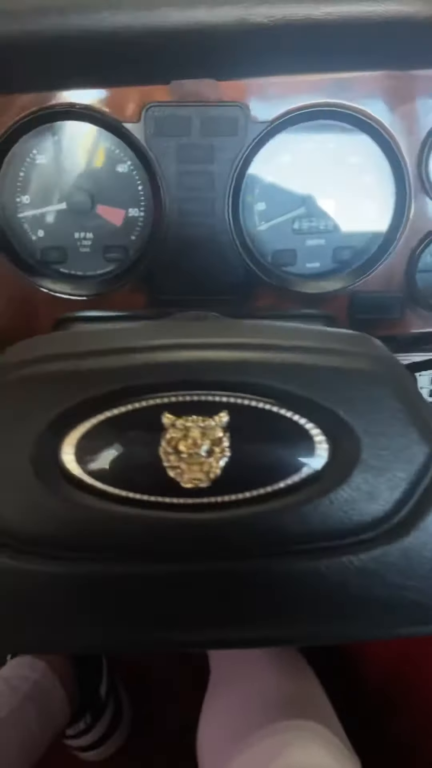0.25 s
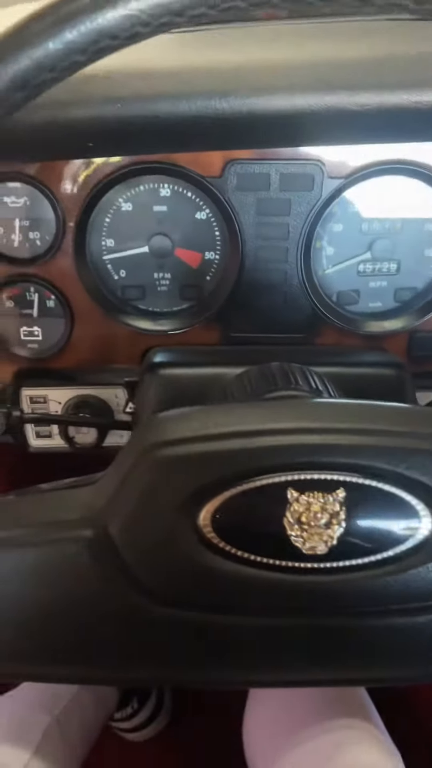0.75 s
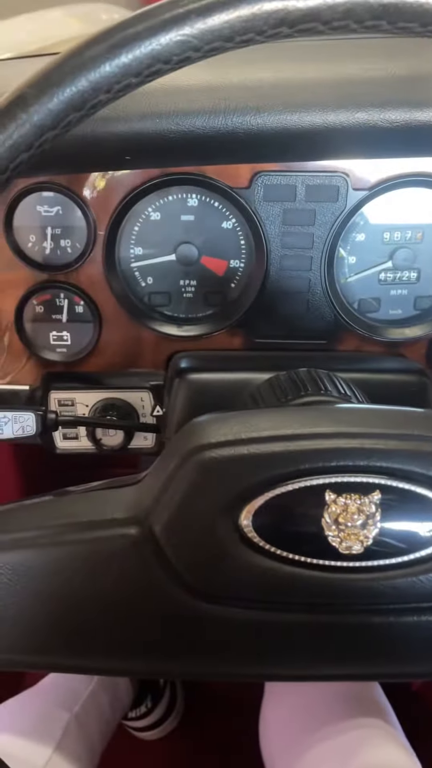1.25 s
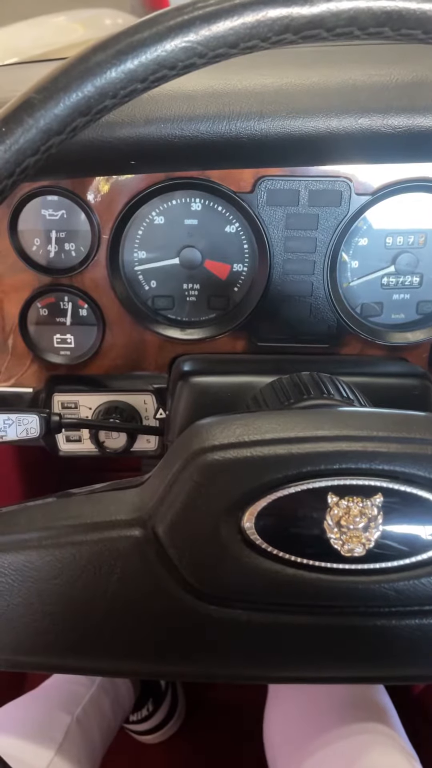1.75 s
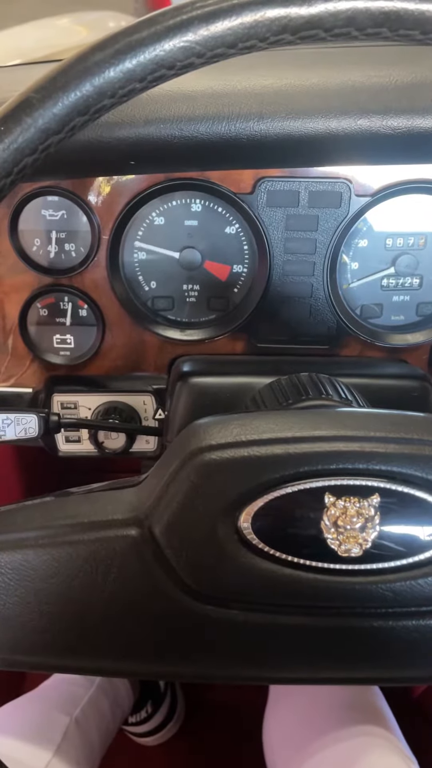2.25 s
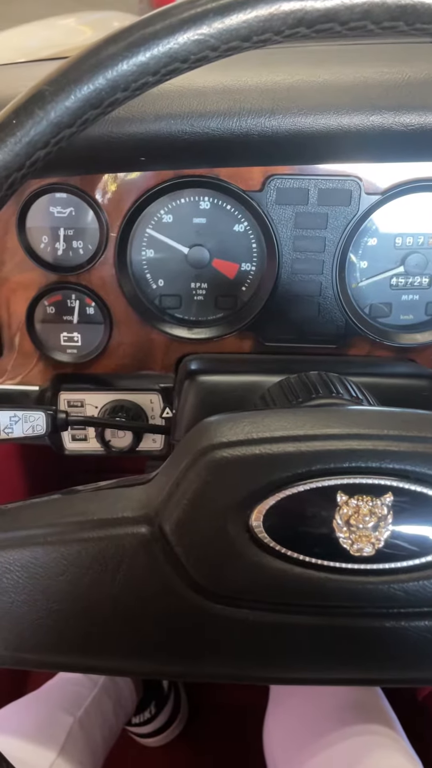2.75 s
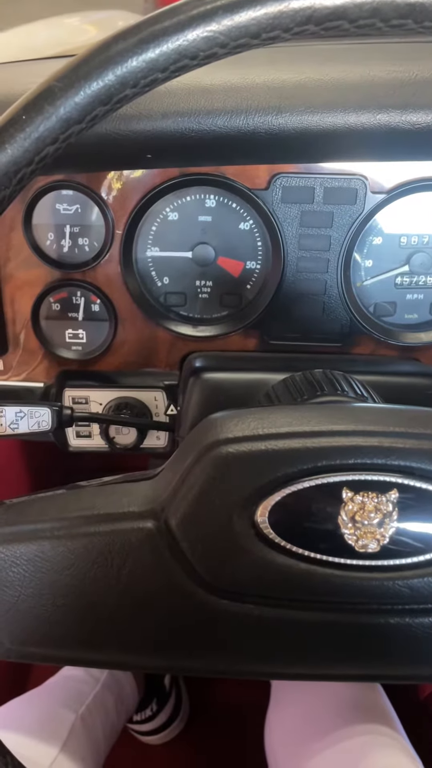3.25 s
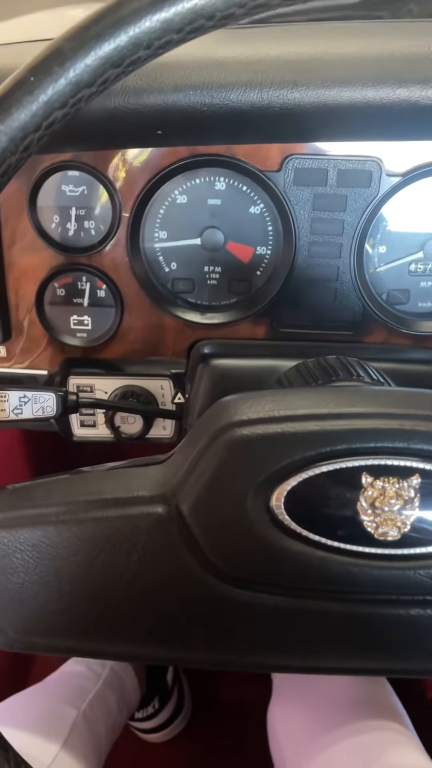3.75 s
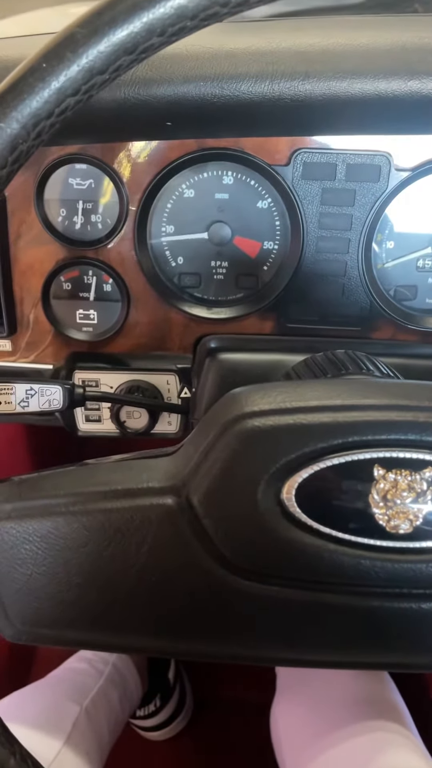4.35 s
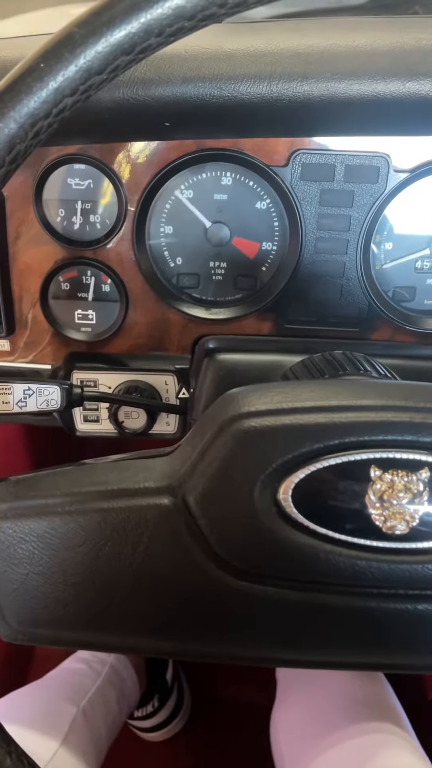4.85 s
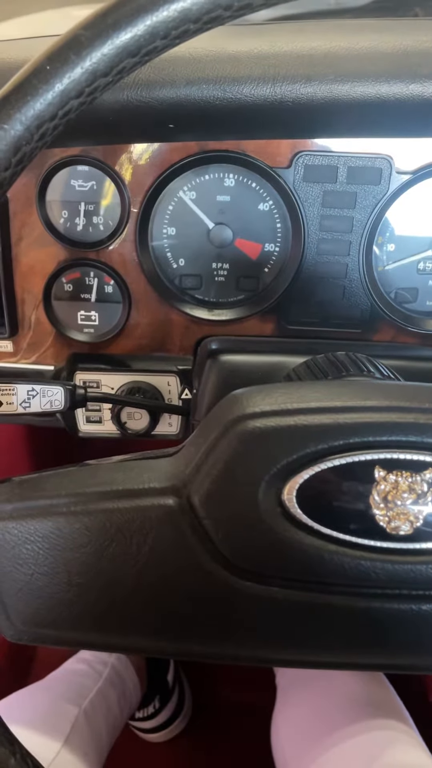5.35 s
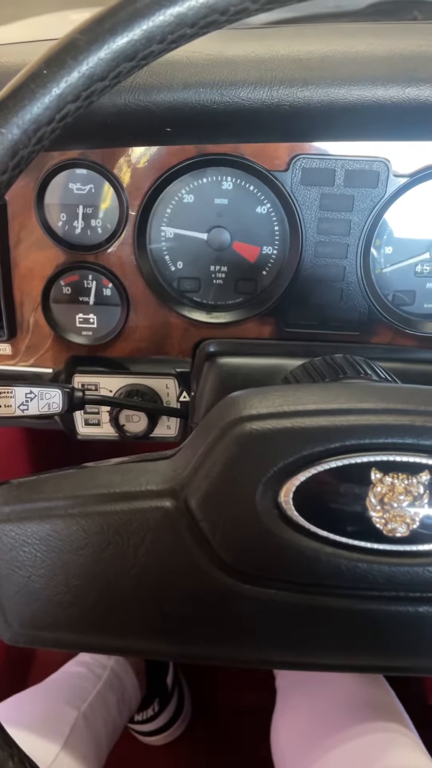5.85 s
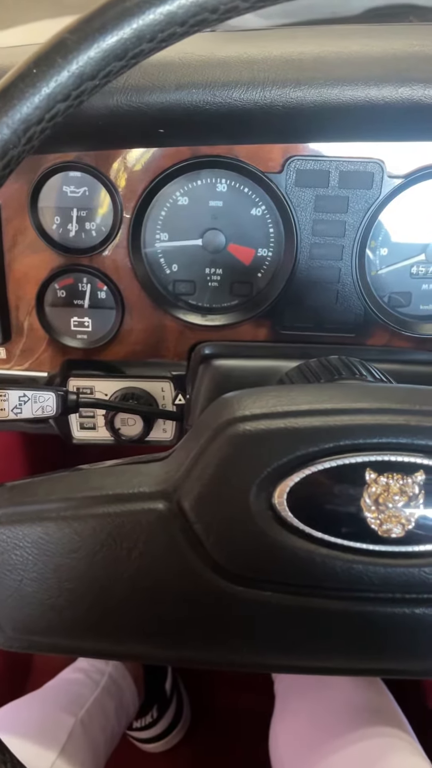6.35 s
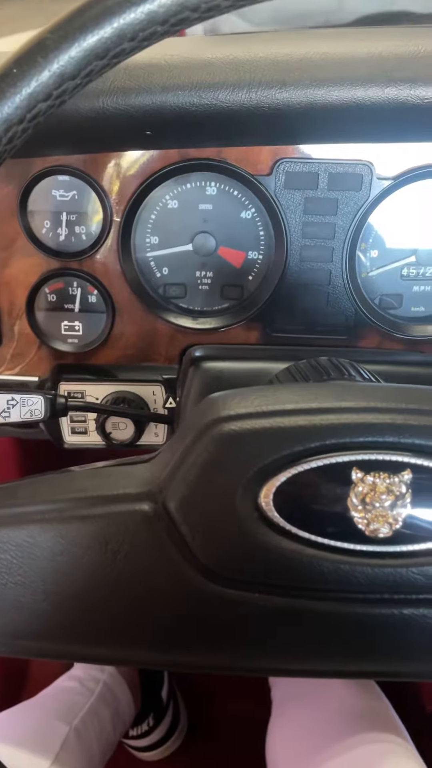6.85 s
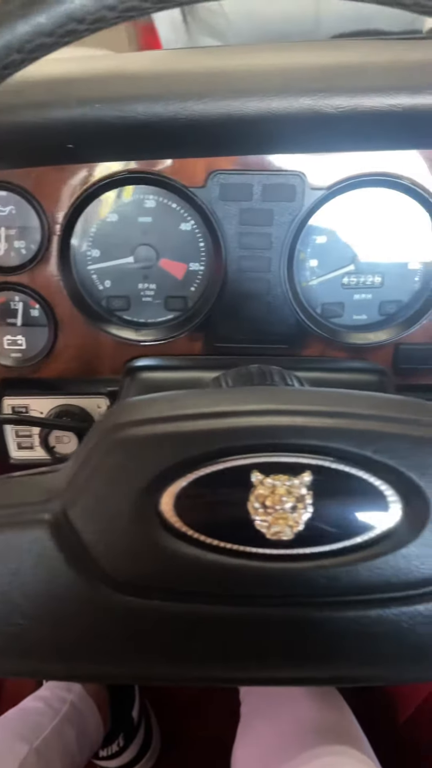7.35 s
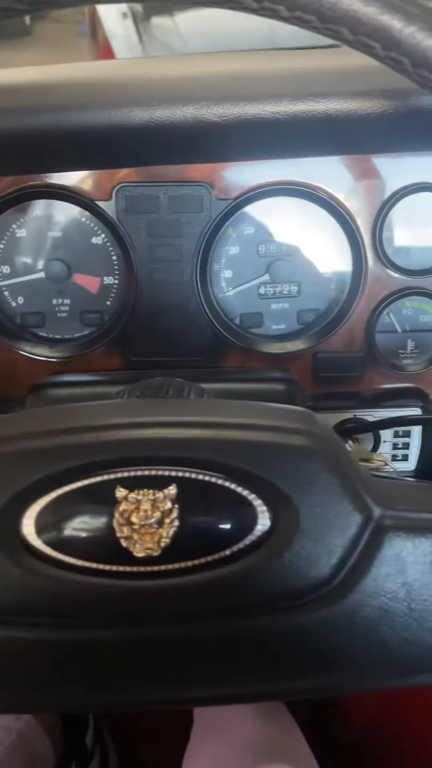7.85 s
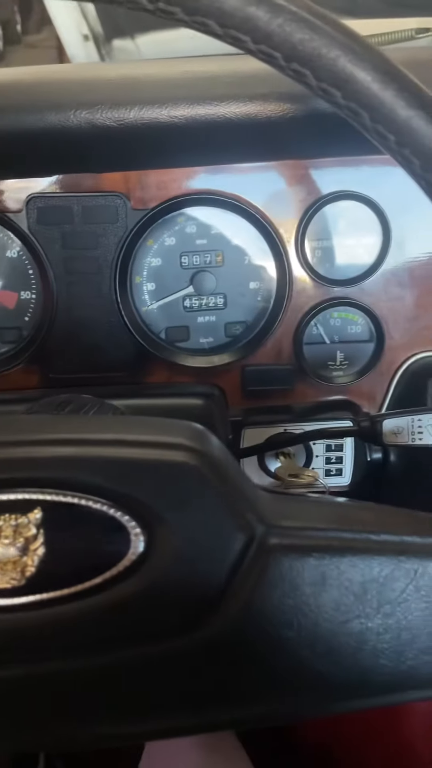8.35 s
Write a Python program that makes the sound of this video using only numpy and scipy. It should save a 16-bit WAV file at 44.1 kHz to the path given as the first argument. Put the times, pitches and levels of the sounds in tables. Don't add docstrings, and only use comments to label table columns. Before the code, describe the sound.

Inside a parked car, a handheld stereo phone at the driver's seat picks up a six-cylinder engine. From 0 to 1.7 seconds it idles evenly, a deep soft throb of about 37 pulses per second under gentle valve and mechanical rush, with faint electrical whine and trim buzz. At about 1.8 the throttle hisses open and the engine swells to a boomy, growling peak around 2.4, then falls with low exhaust thumps, nearing idle by 3.6. Leather creaks faintly around 3.9 and 4.4. From 4.2 a second, stronger blip climbs, with airy hiss and intake honk, to a higher peak near 5, held until about 5.3. Panels ring and boom loudly as it runs down through 5.8. By 6.5 it dips slightly below idle, then steadies, purring unchanged until the end at 8.6. The cabin is close and muffled, with very short reflections.

```python
import sys
import numpy as np
from scipy import signal
from scipy.fft import rfft, irfft, next_fast_len
from scipy.io import wavfile
from scipy.ndimage import uniform_filter1d

SR = 44100
rng = np.random.default_rng(int(sys.argv[2]) if len(sys.argv) > 2 else 0)


def ratio(d):
    e = np.asarray(d, float) / 20
    return 10 ** e


def output_pcm(signal):
    pcm = np.clip(np.atleast_2d(signal).T, -1, 1) * 32767
    wavfile.write(sys.argv[1], SR, np.round(pcm).astype(np.int16))


N = 379701
IDLE_HZ = 37

# frequency in Hz, lead in radians.
PORT_LEAD = [(0, 0), (190, -.1), (255, .2), (300, -1.2), (335, -.9), (370, .4), (410, 0), (455, .7),
             (550, .1), (620, 1.3), (710, 3), (770, .9), (820, 1.3), (900, .6), (1100, .7), (1170, -.7),
             (1240, 2.4), (1320, 2.2), (1380, 0), (1700, -.1), (2400, -1.2), (3100, .1), (5200, .7),
             (5900, -.1), (6550, -.75), (7240, -2.1), (8250, -3.14), (9300, -4.1), (10000, -5),
             (11600, -6.28), (12800, -7), (13600, -8.6), (14600, -9.42), (16000, -9.8)]
# frequency in Hz, left minus right in dB.
PORT_LEAN = [(60, -3), (110, 4.5), (200, 1.5), (240, 7.5), (300, -3), (370, -2), (470, 4.5), (560, -3),
             (770, 4), (900, 1.5), (1220, -0.5), (2230, 0.5), (4070, 6.5), (7440, 1.5), (13600, -1.5)]


def in_time(rows):
    s, *columns = np.transpose(rows)
    return [np.interp(np.arange(N) / SR, s, c) for c in columns]


def at_hz(points, hz):
    point_hz, value = np.transpose(points)
    return np.interp(np.log(hz + 1), np.log(point_hz + 1), value)


def drift(rate):
    step = 40
    pole = np.exp(-2 * np.pi * rate * step / SR)
    draws = rng.standard_normal(N // step + 2002)
    slow = signal.lfilter([1], [1, -2 * pole, pole * pole], draws)[2000:]
    return np.interp(np.arange(N) / step, np.arange(len(slow)), slow / slow.std())


def per_firing(firings):
    count = int(firings[-1]) + 2
    return np.interp(firings, np.arange(count), rng.standard_normal(count))


def tone(hz):
    return np.sqrt(2) * np.sin(2 * np.pi * np.cumsum(hz) / SR)


def follows_speed(rate, pull, idle_db, doubling_db, lag_s, pulling_db, rounding_db):
    s = np.arange(N) / SR
    doublings = np.log2(np.interp(s - lag_s, s, rate) / IDLE_HZ)
    swell_db = doubling_db * doublings - rounding_db * doublings ** 2
    return idle_db + swell_db + pulling_db * np.maximum(pull, 0)


def cabin_echo(t60_s):
    s = np.arange(SR // 8) / SR
    echo = rng.standard_normal((2, len(s))) * ratio(-60 * s / t60_s)
    return echo / np.sqrt(np.sum(echo ** 2, axis=1, keepdims=True))


def heard_noise(spectrum, modes=(), pulses=0):
    # frequency in Hz, likeness from 0 to 1.
    likeness = [(60, .995), (130, 0.96), (190, 1), (236, .85), (275, .4), (312, .9), (355, .5), (420, .7),
                (475, .1), (540, .45), (600, .15), (700, .5), (740, .25), (780, .65), (840, .35),
                (930, .72), (1030, .68), (1180, .2), (1290, .5), (1380, .25), (1440, .6), (1520, .3),
                (1690, .6), (1930, .15), (2250, .5), (2600, 0.2), (3800, 0.64), (5200, 0.56), (6500, 0.84),
                (8000, 1), (15000, 0.83)]
    size = next_fast_len(N)
    hz = np.arange(size // 2 + 1) * SR / size
    gain_db = at_hz(spectrum, hz)
    for centre_hz, width_hz, db in modes:
        gain_db = gain_db + db / (1 + (2 * (hz - centre_hz) / width_hz) ** 2)
    near = rfft(cabin_echo(0.068)[0], size)
    gain = ratio(gain_db) * np.abs(1 + 0.43 * np.clip(hz / 1200 - 1, 0, 1) * near)
    shared, own = rfft(rng.standard_normal((2, N)) + pulses, size)
    alike = np.clip(at_hz(likeness, hz), 0, 1)
    lead = np.interp(hz, *np.transpose(PORT_LEAD))
    ports = ratio(at_hz(PORT_LEAN, hz) / 2) * np.exp(.5j * lead)
    left = np.sqrt(1 + alike) * shared + np.sqrt(1 - alike) * own
    right = np.sqrt(1 + alike) * shared - np.sqrt(1 - alike) * own
    pair = irfft(gain * np.array([left * ports, right / ports]), size)[:, :N]
    return pair / pair.std()


def swelling_booms(table):
    out = np.zeros((2, N))
    side = np.array([[.5], [-.5]])
    for start_s, hz, db, rise_s in table:
        s = np.arange(int(6 * rise_s * SR)) / SR
        swell = (s / rise_s * np.exp(1 - s / rise_s)) ** 2
        level = ratio(db + side * at_hz(PORT_LEAN, hz))
        lead = side * np.interp(hz, *np.transpose(PORT_LEAD))
        at = int(start_s * SR)
        out[:, at:at + len(s)] += level * swell * np.sin(2 * np.pi * hz * s + lead)
    return out


def crank_speed():
    # time in seconds, firing rate in Hz.
    speed = [(0, 36.67), (.4, 36.44), (.7, 37.02), (1.6, 37), (1.86, 44.24), (2.29, 74.18), (2.39, 80.7),
             (2.52, 79.97), (3.12, 50.64), (3.6, 38.17), (4.02, 35.02), (4.36, 47.52), (4.7, 81.3),
             (4.95, 94.94), (5.245, 94.83), (5.44, 83.28), (5.94, 51.6), (6.25, 40.85), (6.52, 36.67),
             (6.8, 35.45), (7.03, 34.93), (7.18, 36.64), (7.55, 37.78), (7.9, 36.92), (8.61, 36.55)]
    return uniform_filter1d(in_time(speed)[0], SR // 12)


def engine_pull(rate):
    drag_per_s, full_pull_hz_per_s = 0.16, 32
    effort = np.gradient(rate) * SR + drag_per_s * (rate - IDLE_HZ)
    return np.tanh(effort / full_pull_hz_per_s)


def air_draw():
    # time in seconds, level in dB.
    air = [(0.0, -56.5), (1.63, -55.5), (1.68, -53), (1.75, -56), (1.82, -50), (2.4, -48), (2.49, -57),
           (3.43, -64), (4.15, -56.5), (4.175, -49.5), (4.27, -50), (4.53, -45.5), (6.28, -65), (6.88, -58),
           (7.87, -57.5), (8.61, -60)]
    return in_time(air)[0]


def order_levels(rate, pull):
    # the order's own pitch in Hz, level in dB.
    first_path = [(34, -28), (38, -29), (46.5, -15.5), (52, -19.5), (58, -37), (69, -23.5), (79, -30.5),
                  (87, -24.5), (95, -22.5)]
    second_path = [(70, -29.5), (76, -35), (90, -31.5), (100, -41), (120, -35), (135, -60), (175, -66),
                   (195, -51)]
    uneven_path = [(55, -45), (67, -31), (85, -46), (96, -39), (105, -32.5), (120, -30.5), (133, -42),
                   (140, -53)]
    half_path = [(18, -38), (24, -35), (29, -52), (34, -44), (39, -36), (43, -38.5), (48, -56)]
    cabin_lag_s, fuel_cut_hz, flutter_db = 0.022, 66, .4
    s = np.arange(N) / SR
    rate = np.interp(s - cabin_lag_s, s, rate)
    revving = np.clip(rate / IDLE_HZ - 1.3, 0, .5) * 2
    deeper = 1 + .9 * np.clip(rate / fuel_cut_hz - 1, 0, .2) * 5
    # path, orders per firing, dB when pulling, dB on the overrun
    orders = [(first_path, 1, 1.5, -12), (second_path, 2, 3, -4.5),
              (uneven_path, 1.5, 1.5, -4.5), (half_path, .5, -23, 0)]
    levels = []
    for path, order, pulling_db, overrun_db in orders:
        load_db = pulling_db * np.maximum(pull, 0) - overrun_db * np.minimum(pull, 0) * deeper
        levels.append(at_hz(path, order * rate) + load_db + flutter_db * revving * drift(7.07))
    return levels


def exhaust_boom(rate, pull, firings):
    # frequency in Hz, level in dB.
    third_path = [(95, -43), (110, -42), (128, -42), (150, -47), (210, -45), (300, -48)]
    first_db, second_db, uneven_db, half_db = order_levels(rate, pull)
    third_db = at_hz(third_path, 3 * rate)
    turn = 2 * np.pi * firings
    slant = -.95
    first = ratio(first_db + 0.78 * drift(3.7)) * np.cos(turn + .08 * drift(4.7))
    second = ratio(second_db + 0.7 * per_firing(firings)) * np.cos(2 * turn + slant + 0.2 * drift(3.0))
    third = ratio(third_db + 0.64 * per_firing(firings))
    third = third * np.cos(3 * turn + 1.45 * slant + 0.32 * drift(1.5))
    lower = ratio(third_db - 2.0 + 2.0 * drift(4.2)) * np.cos(2.5 * turn + .5 * drift(3.3))
    upper = ratio(third_db - 9.5 + 2.0 * drift(8.8)) * np.cos(3.5 * turn + .5 * drift(2.2))
    revving = np.clip((rate - 50) / 15, .12, 1)
    uneven = ratio(uneven_db) * np.cos(1.5 * turn + .5 * drift(2))
    half = ratio(half_db) * np.cos(turn / 2 + 0.37 * drift(0.59)) * revving
    boom = -np.sqrt(2) * (first + second + third + lower + upper + revving * (uneven + half))
    return boom * ratio([[.4], [-.4]])


def combustion(rate, firings):
    cylinders = [2.5, 2.5, 4, -14, 3.5, -3]
    at = np.flatnonzero(np.diff(np.floor(firings)))
    strength_db = np.resize(cylinders, len(at)) + 0.65 * rng.standard_normal(len(at))
    knocks = np.zeros(N)
    knocks[at] = ratio(strength_db) / np.sqrt(rate[at])
    size = next_fast_len(N)
    echo = rfft(cabin_echo(0.16), size)
    smeared = irfft(rfft(knocks, size) * echo / np.abs(echo), size)[:, :N]
    return .5 * smeared / smeared.std()


def body_rumble(roar_db):
    # frequency in Hz, level in dB per Hz.
    rumble = [(20, -29), (30, -6), (38, -3), (45, 1.5), (60, 2), (90, 5.5), (125, -3.5), (150, -1.5),
              (200, -47.5)]
    return ratio(-13.5 + 0.64 * roar_db) * heard_noise(rumble)


def panel_roar(rate, roar_db, filled_db, knocks):
    # frequency in Hz, level in dB per Hz.
    roar = [(110, -72), (150, -20), (200, -7.5), (270, -10), (400, -13), (550, -19.5), (680, -19),
            (900, -66)]
    # frequency in Hz, width in Hz, height in dB.
    panels = [(176.2, 18.8, 10), (194.1, 11.2, 7), (213.3, 13, 4), (257, 17, -3), (303, 10.6, 5),
              (319.8, 19.8, 9.5), (344.5, 11.4, 6.5), (418, 15, 6.5), (435.8, 12, 7), (472, 25, -2),
              (514, 10, 2.5), (565, 40, -3), (605, 40, 4)]
    surge_db = .7 * np.log2(rate / IDLE_HZ) * drift(3.9)
    level_db = roar_db + surge_db + 0.1 * filled_db + 0.5 + 0.079 * drift(11.0)
    return ratio(level_db) * heard_noise(roar, panels, pulses=knocks)


def bulkhead_rush(rush_db, filled_db, beat, knocks):
    # frequency in Hz, level in dB per Hz.
    rush = [(350, -10.5), (520, 3), (700, -3), (950, -6.5), (1300, -2.5), (1900, -6.5), (2550, -7),
            (2750, -11), (4500, -21), (6500, -54)]
    # frequency in Hz, width in Hz, height in dB.
    bulkhead = [(696, 20, 0), (780, 9.5, 7), (977, 105, 6.5), (1163, 108, 6), (1190, 31, -5.5),
                (1320, 79, 0), (1425, 31, 3.5), (1520, 26, 2.5), (1705, 42, 4), (1830, 24, 6),
                (1935, 49, 5), (2140, 190, 3.5), (2430, 200, 0)]
    level_db = rush_db + 2.0 + 0.29 * filled_db + 0.16 * beat
    return ratio(level_db) * heard_noise(rush, bulkhead, pulses=0.34 * knocks)


def block_drumming(rush_db, knocks):
    # frequency in Hz, level in dB per Hz.
    block = [(650, -15), (780, 2.5), (870, 4.5), (985, 2.5), (1080, -12), (1150, -3), (1250, -28.5)]
    return ratio(1.555 * rush_db + 13.5) * heard_noise(block, pulses=knocks)


def valve_gear(rate, pull, filled_db, beat):
    # frequency in Hz, level in dB per Hz.
    valves = [(1700, -16), (2250, 2.5), (2700, -3), (3500, 0.5), (4500, -1.5), (6000, -2.5), (7500, -9.5),
              (9000, -23), (12000, -40)]
    # frequency in Hz, width in Hz, height in dB.
    covers = [(3950, 73, -4), (3800, 72, 2), (5080, 140, 3.5), (5680, 41, 2.5), (6170, 72, -16),
              (6570, 42, 2)]
    valve_db = follows_speed(rate, pull, idle_db=-50, doubling_db=7.2, lag_s=0.22, pulling_db=0.5,
                             rounding_db=0.5)
    level_db = valve_db + 0.55 * filled_db + 0.29 * beat + 0.15 * drift(9.8)
    return ratio(level_db) * heard_noise(valves, covers)


def throttle_hiss(air_db, beat):
    # frequency in Hz, level in dB per Hz.
    hiss = [(5000, -12.5), (7000, -2.5), (8200, 1), (10000, 4.5), (11500, -8), (13000, -8.5), (14500, -12),
            (15600, -14), (16000, -50)]
    # frequency in Hz, width in Hz, height in dB.
    throttle = [(9790, 110, -7), (10700, 120, -1.5)]
    return ratio(air_db + 4.0 + 0.63 * beat + 2.0 * drift(24)) * heard_noise(hiss, throttle)


def throttle_whistle(air_db):
    # frequency in Hz, level in dB per Hz.
    whistle = [(10700, -26), (10950, -9), (11200, -18), (11460, -11), (11560, -11), (11660, -13),
               (11790, -15), (12100, -15), (12500, -34)]
    # frequency in Hz, width in Hz, height in dB.
    lines = [(11665, 40, 11), (11200, 60, 3), (11800, 50, 3)]
    return ratio(1.586 * air_db + 26.5 + 1.4 * drift(11)) * heard_noise(whistle, lines)


def intake_honk(rate, pull):
    # frequency in Hz, level in dB per Hz.
    intake = [(800, -30), (1000, -6), (1160, 2.5), (1300, -14), (1900, -9), (2200, -6), (2520, 0.5),
              (2750, -25)]
    # frequency in Hz, width in Hz, height in dB.
    honks = [(1130, 50, 4), (2220, 70, 5), (970, 40, 4)]
    level_db = -63.5 + 16 * np.maximum(pull, 0) + 5.1 * np.log2(rate / IDLE_HZ) + 2.9 * drift(12)
    return ratio(level_db) * heard_noise(intake, honks)


def alternator(rate, pull, beat):
    # frequency in Hz, level in dB.
    whine_path = [(1120, -51.5), (1165, -54.5), (1190, -58), (1260, -67), (1700, -70), (2150, -60),
                  (2480, -52), (2650, -60), (2800, -72)]
    hz = 32.0 * rate
    charging_db = follows_speed(rate, pull, idle_db=-7, doubling_db=7.5, lag_s=1.05, pulling_db=5,
                                rounding_db=0)
    level_db = at_hz(whine_path, hz) + charging_db + 2.6 * drift(10)
    whine = ratio(level_db) * (1 + .7 * beat) * tone(hz * (1 + .003 * drift(12)))
    return whine * ratio([[1.1], [-1.1]])


def fuel_pump():
    # time in seconds, pitch in Hz, level in dB.
    pump = [(0, 418, -60), (.5, 416.3, -51.5), (1.7, 416.2, -49.5), (3.6, 417.5, -55.5), (6.5, 417.9, -58),
            (7.2, 415, -56), (8, 418, -61), (8.61, 414.2, -62)]
    hz, level_db = in_time(pump)
    return ratio(level_db + 1.3 * drift(9.2)) * tone(hz * (1 + 0.0039 * drift(4.9)))


def loose_trim(rate):
    # frequency in Hz, width in Hz, level in dB.
    shakes = [(320, 13.7, -50.5), (178, 16, -54), (1166, 50, -64), (2300, 90, -62.5)]
    out = 0
    for hz, width_hz, db in shakes:
        b, a = signal.iirpeak(hz, hz / width_hz / 2, fs=SR)
        once = signal.lfilter(b, a, rng.standard_normal((2, N)))
        mid, side = signal.lfilter(b, a, once)
        out = out + ratio(db + 3.0 * drift(5.0)) * (mid + 0.39 * side * [[1], [-1]]) / mid.std()
    return out * ratio(-6 * np.log2(rate / IDLE_HZ))


def seat_leather():
    # start in seconds, level in dB, length in seconds.
    creaks = [
        (.2, -60, .02),
        (1.236, -59, .02),
        (1.87, -56, .025),
        (3.856, -54, 0.029),
        (4.3, -54, .03),
        (4.372, -49, 0.051),
        (4.51, -50, .05),
        (6.46, -60, 0.036),
        (7.898, -58, .02),
    ]
    s = np.arange(N) / SR
    band = signal.butter(2, [7200, 9600], "band", fs=SR, output="sos")
    rub = signal.sosfilt(band, rng.standard_normal((2, N)))
    stroke = 0
    for start_s, db, length_s in creaks:
        stroke = stroke + ratio(db) * np.clip(1 - (2 * (s - start_s) / length_s - 1) ** 2, 0, 1)
    return 3 * rub * stroke


def panel_booms():
    # start in seconds, pitch in Hz, level in dB, rise in seconds.
    booms = [(2.04, 333.4, -28.5, 0.044), (2.33, 426, -34, .05), (2.36, 214, -28, 0.061),
             (2.52, 197.6, -26.5, 0.07), (2.53, 307.4, -30, 0.077), (2.75, 205, -36, 0.052),
             (1.95, 200, -35, .06), (2.68, 530, -36.5, .06), (2.5, 2480, -45, .05), (4.67, 2500, -44, .04),
             (2.05, 120, -31, .05), (5.8, 210, -32, .04), (4.65, 200, -34, .08), (6.62, 600, -49, 0.084),
             (2.8, 425.2, -31, 0.047), (5.02, 298.6, -25, 0.04), (5.07, 199.5, -25.5, .05),
             (5.07, 337, -22.5, 0.055), (5.18, 181.1, -26.5, 0.073), (5.32, 330, -21.5, 0.062),
             (5.48, 325.3, -20.5, 0.081), (5.48, 196, -27, 0.1), (5.65, 190.1, -27, 0.0828),
             (5.78, 195, -29, 0.044), (4.62, 204.5, -37, 0.0643), (4.8, 320, -40, 0.052),
             (4.42, 194, -32, .06), (3.3, 192, -36, 0.0701), (2.17, 510, -39.5, 0.053),
             (2.38, 972, -40, .05), (5.31, 1020, -38, .05), (5.02, 1000, -34, .03), (4.5, 1155, -41, 0.087),
             (5.36, 460, -32, .05), (5.52, 72, -27, .05), (5.79, 170, -31, .04), (6.4, 190, -38, 0.061),
             (3.7, 310, -42, 0.081), (.5, 322, -41.5, 0.057)]
    return swelling_booms(booms)


def exhaust_thumps():
    # start in seconds, pitch in Hz, level in dB, rise in seconds.
    thumps = [
        (2.51, 42, -22.5, 0.045),
        (2.72, 49, -19, 0.024),
        (2.66, 73.1, -19.5, 0.037),
        (5.28, 43.5, -15.5, 0.096),
        (5.15, 48, -29, .05),
        (2.88, 50, -28, .05),
        (5.62, 47.7, -26, 0.066),
        (3.5, 36.95, -23.5, 0.062),
    ]
    return swelling_booms(thumps).mean(axis=0) * ratio([[.4], [-.4]])


def scene():
    rate = crank_speed()
    pull = engine_pull(rate)
    air_db = air_draw()
    filled_db = uniform_filter1d(air_db, SR // 10) + 57.5
    firings = np.cumsum(rate) / SR
    beat = np.cos(2 * np.pi * firings)
    roar_db = follows_speed(rate, pull, idle_db=-40.5, doubling_db=16, lag_s=0.1657, pulling_db=0.5,
                            rounding_db=3)
    rush_db = follows_speed(rate, pull, idle_db=-47.5, doubling_db=13, lag_s=0.17, pulling_db=1,
                            rounding_db=1.2)
    knocks = combustion(rate, firings)
    mix = exhaust_boom(rate, pull, firings) + body_rumble(roar_db)
    mix = mix + panel_roar(rate, roar_db, filled_db, knocks)
    mix = mix + bulkhead_rush(rush_db, filled_db, beat, knocks) + block_drumming(rush_db, knocks)
    mix = mix + valve_gear(rate, pull, filled_db, beat)
    mix = mix + throttle_hiss(air_db, beat) + throttle_whistle(air_db) + intake_honk(rate, pull)
    mix = mix + alternator(rate, pull, beat) + fuel_pump() + loose_trim(rate)
    return mix + seat_leather() + panel_booms() + exhaust_thumps()


def band_limit(x):
    return signal.sosfilt(signal.butter(12, 15750, fs=SR, output="sos"), x)


def record(dry):
    low_cut = signal.butter(4, 27, "high", fs=SR, output="sos")
    mix = signal.sosfiltfilt(low_cut, dry)
    return band_limit(mix)


dry = scene()
out = record(dry)
output_pcm(out)
```